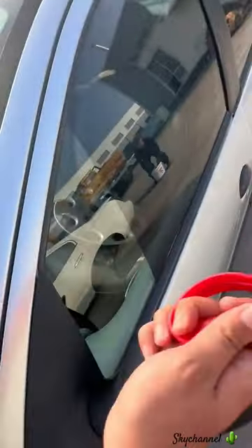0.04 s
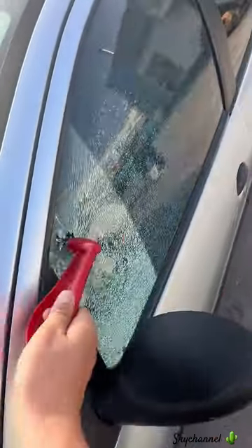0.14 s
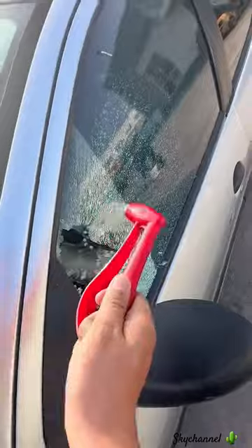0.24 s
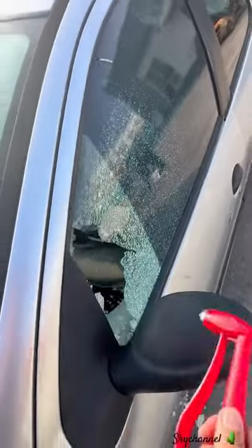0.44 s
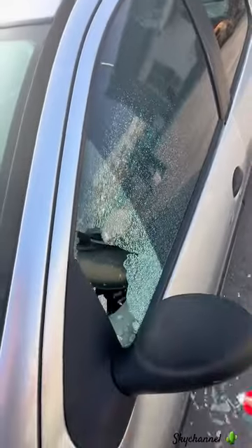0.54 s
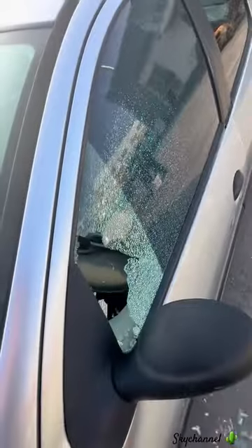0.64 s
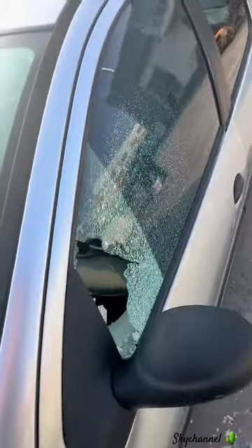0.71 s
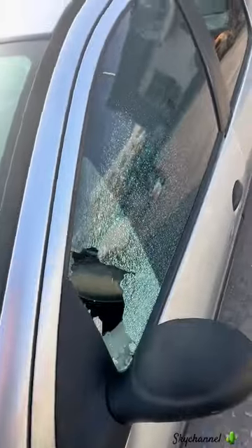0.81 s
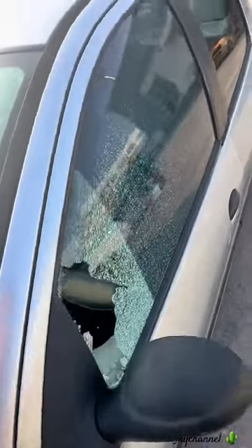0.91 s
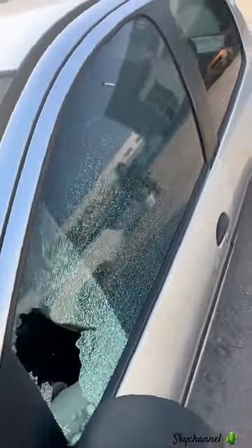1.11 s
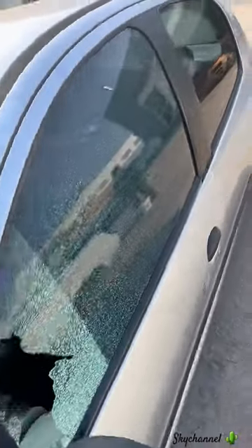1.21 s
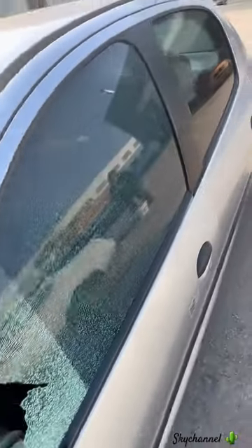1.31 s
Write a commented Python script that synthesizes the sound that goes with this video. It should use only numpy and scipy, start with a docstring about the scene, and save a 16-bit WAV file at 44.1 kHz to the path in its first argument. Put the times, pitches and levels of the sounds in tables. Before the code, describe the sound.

A car window shatters under a hammer blow, glass crumbs clattering down the door.

```python
"""A car's side window breaks under an emergency hammer, outdoors and close by.
The tip touches, the pane cracks and rings, and the door thumps as the hammer's head lands.
The tempered glass gives way in clumps of briefly ringing crumbs that clatter down the door and
thin out, with sharp snaps and the clinks of larger shards. A low street rumble lies underneath."""
import sys
import numpy as np
from scipy import signal
from scipy.fft import rfft, irfft, next_fast_len
from scipy.io import wavfile

SR = 44100
rng = np.random.default_rng(int(sys.argv[2]) if len(sys.argv) > 2 else 0)


def output_pcm(signal):
    """Save a mono or channel-first signal as 16-bit PCM at the path in sys.argv[1].

    Samples are clipped to [-1, 1] before scaling.
    """
    pcm = np.clip(np.atleast_2d(signal).T, -1, 1) * 32767
    wavfile.write(sys.argv[1], SR, np.round(pcm).astype(np.int16))


N = 59535


def amp(db):
    return 10 ** (np.asarray(db) / 20)


def unit_rms(x):
    return x / np.sqrt(np.mean(x ** 2) + 1e-20)


def along(points, hz):
    """Interpolate (frequency, value) points on a log axis."""
    f, v = np.transpose(points)
    return np.interp(np.log(hz + 1), np.log(f + 1), v)


def since(s):
    """Seconds after time s, zero before it."""
    return np.maximum(np.arange(N) / SR - s, 0)


def curves(rows):
    """One value per sample for each column after the time."""
    s, *columns = np.transpose(rows)
    return [np.interp(since(0), s, column) for column in columns]


def filtered(x, response):
    """Apply a complex frequency response."""
    size = next_fast_len(N + SR // 4)
    return irfft(rfft(x, size) * response(np.fft.rfftfreq(size, 1 / SR)), size)[..., :N]


def noise(colour):
    """Two independent coloured noises, rms 1."""
    return unit_rms(filtered(rng.standard_normal((2, N)), lambda hz: amp(along(colour, hz))))


def burst(s, db, t60_s, attack_s=1e-4, hold_s=0):
    """Envelope: linear attack, hold from onset, exponential release."""
    return np.minimum(since(s) / attack_s, 1) * amp(db - 60 * since(s + hold_s) / t60_s)


def ring(s, hz, db, t60_s, attack_s, drift_rad=0):
    """One struck mode: a decaying sine."""
    return burst(s, db, t60_s, attack_s) * np.sin(2 * np.pi * hz * since(s) + drift_rad)


# likeness at the two microphone ports (frequency [Hz], coherence [clipped to -1..1])
PORT_COHERENCE = [(300, 2.8), (700, 0.4), (1400, 0.64), (2200, 1.45), (5000, -0.03), (7500, 1.4),
                  (14000, 6)]


def widen(pair, coherence=PORT_COHERENCE):
    """Mix two independent signals to left and right with the given coherence."""
    angle = lambda hz: np.arccos(np.clip(along(coherence, hz), -1, 1)) / 2
    mid, side = filtered(pair, lambda hz: np.array([np.cos(angle(hz)), np.sin(angle(hz))]))
    return np.array([mid + side, mid - side])


# rumble spectrum (frequency [Hz], gain [dB])
STREET_COLOUR = [(20, -4), (40, -1.5), (60, 2), (130, -3), (165, -9.5), (190, 2), (225, -10.5), (370, -11),
                 (600, -20.5), (2000, -34), (8000, -39), (10500, -47), (12000, -86)]
# rumble envelope (time [s], level [dB])
STREET_ENVELOPE = [(0, -46.5), (.2, -43), (.97, -44), (1.15, -41.5), (1.35, -46)]
# left-right likeness (frequency [Hz], coherence [0..1])
STREET_COHERENCE = [(60, 0.98), (400, 0.98), (2000, 0.067), (9000, 0.72)]


def street():
    """Low outdoor rumble with a faint hiss."""
    return widen(noise(STREET_COLOUR), STREET_COHERENCE) * amp(curves(STREET_ENVELOPE)[0])


# tip's touch, break and later splits (time [s], level [dB], t60 [s])
PANE_CRACKS = [(0.2012, -31, 0.13), (0.2099, -5.5, 0.0068), (0.2106, -24, 0.054), (0.2145, -20, 0.007),
               (0.3488, -18, 0.031), (0.4502, -16.5, 0.016), (0.899, -33, 0.024)]
# crack spectrum (frequency [Hz], gain [dB])
PANE_CRACK_COLOUR = [(200, 0), (1000, -1.5), (1400, 5.5), (2100, -13), (2900, 9.5), (4300, -7), (5200, -4),
                     (6250, -2), (7300, -3), (10000, -3), (15500, -5)]
# pane, struck by the tip (frequency [Hz], level [dB], t60 [s])
PANE_MODES = [(2840, -5, 0.0098), (6320, -8, 0.011), (1290, -14.5, 0.016), (940, -14, 0.015),
              (841, -7.5, 0.015), (395, -24, 0.055)]
# door, struck by the head (frequency [Hz], level [dB], t60 [s])
DOOR_MODES = [(128, -13.5, 0.052), (300, -20, 0.052), (185, -26, 0.071), (448, -21, 0.12),
              (680, -25.5, 0.045), (960, -23, 0.028), (1230, -29, 0.24), (1608, -26.5, 0.13),
              (55.3, -24.5, 0.17)]
PANE_HIT_S, PANE_ATTACK_S = .2105, .00097
DOOR_HIT_S, DOOR_ATTACK_S = .2243, .0016


def hammer_blow():
    """The tip touches, the pane cracks through, and pane and door ring briefly."""
    cracks = widen(noise(PANE_CRACK_COLOUR)) * sum(burst(*crack) for crack in PANE_CRACKS)
    pane = sum(ring(PANE_HIT_S, *mode, PANE_ATTACK_S) for mode in PANE_MODES)
    door = sum(ring(DOOR_HIT_S, *mode, DOOR_ATTACK_S) for mode in DOOR_MODES)
    return cracks + pane + door


def fragment_hits(hz, spread_oct, t60_cycles, scatter_db, count, fragments=110):
    """Random contacts, rms 1, shared among fragments that each ring at their own pitch."""
    which, when, chance = rng.random((3, count))
    rank = (np.arange(fragments)[:, None] + rng.random((fragments, 1))) / fragments
    deviation = np.log((rank + .02) / (1.02 - rank)) * np.sqrt(3) / np.pi  # logistic spread
    pitch_hz = np.minimum(hz * 2 ** (spread_oct * deviation), SR / 2)
    age = np.arange(int(t60_cycles * SR / hz))
    cycles = pitch_hz * age / SR
    rings = np.sqrt(pitch_hz / hz) * np.sin(2 * np.pi * cycles) * amp(-60 * cycles / t60_cycles)
    strength = amp(-scatter_db * np.log(np.maximum(chance, .02)))
    hits = strength[:, None] * rings[(which * fragments).astype(int)]
    positions = (when * N).astype(int)[:, None] + age
    return unit_rms(np.bincount(positions.ravel(), hits.ravel(), N)[:N])


# fall between clumps (time [s], chunks [dB], crumbs [dB], splinters [dB])
STEADY_FALL = [(.205, -100, -100, -100), (.215, -24.5, -26.5, -35), (.27, -41.5, -34, -40.5),
               (.36, -36.5, -33, -38.5), (.41, -39, -38.5, -44.5), (.46, -36, -29.5, -38.5),
               (.53, -37.5, -38.5, -43.5), (.58, -35, -34, -41), (.66, -38, -35, -40.5),
               (.695, -39, -41, -43.5), (.81, -34.5, -36, -41), (.85, -39.5, -37.5, -47.5),
               (.94, -38, -41.5, -43), (1.0, -50, -45.5, -51), (1.07, -44.5, -48, -62),
               (1.12, -56.5, -62.5, -65.5), (1.35, -56.5, -58.5, -65.5)]
# glass giving way (time [s], chunks [dB], crumbs [dB], splinters [dB], hold [s])
GLASS_CLUMPS = [(0.268, -29, -37, -43, 0.003), (0.295, -29.5, -27.5, -32, 0.014),
                (0.326, -32, -27.5, -27.5, 0.0061), (0.342, -40, -38.5, -29.5, 0.0065),
                (0.42, -48, -25, -28, 0.0071), (0.432, -26.5, -30, -37, 0.0057),
                (0.446, -51, -22, -26, 0.003), (0.47, -36, -28, -50, 0.0083),
                (0.496, -57, -32, -34, 0.0052), (0.541, -33.5, -32.5, -32, 0.02),
                (0.588, -44, -30.5, -36, 0.013), (0.619, -51, -48, -32.5, 0.0038),
                (0.717, -41, -32.5, -37.5, 0.018), (0.75, -48, -31.5, -33, 0.016),
                (0.766, -40, -33, -40, 0.009), (0.79, -33, -38, -42, 0.009),
                (0.809, -45, -27.5, -27, 0.0063), (0.895, -46, -29.5, -39.5, 0.0056),
                (0.916, -43, -31, -39.5, 0.0097), (0.955, -48, -35, -44, 0.012),
                (1.047, -48, -45, -49.5, 0.021), (1.147, -55, -48, -51, 0.0052)]
# tone of the shower (frequency [Hz], gain [dB])
SHOWER_COLOUR = [(300, -4), (950, 1), (2100, -3.5), (3000, .5), (5000, -2), (8000, -2), (10700, 4.5)]
# door under the chunks (frequency [Hz], gain [dB])
DRUM_COLOUR = [(40, -27), (130, -8), (300, -20), (450, -1.5), (650, -17), (1200, -12)]
# fragment sizes (pitch [Hz], spread [oct], t60 [cycles], scatter [dB], contacts [count])
CHUNK, CRUMB = (974, .558, 15.8, 2.2, 2100), (2903, .471, 31.3, 2.35, 5000)
SPLINTER, SLIVER = (7780, .315, 51, 2.4, 9000), (14000, .12, 25, 3.5, 80)
SHOWER_TOP_HZ, SLIVER_DB, DRUM_DB = 11000, -17, -5.5


def falling_glass():
    """Three sizes of fragment fall steadily and in clumps; chunks drum on the door, slivers tick."""
    flows = []
    for size, steady_db in enumerate(curves(STEADY_FALL)):
        clump_power = sum(burst(s, levels_db[size], t60_s=.052, attack_s=.0045, hold_s=hold_s) ** 2
                          for s, *levels_db, hold_s in GLASS_CLUMPS)
        flows.append(np.sqrt(amp(steady_db) ** 2 + clump_power))
    chunk_flow, _, splinter_flow = flows
    streams = np.array([[fragment_hits(*kind) for kind in (CHUNK, CRUMB, SPLINTER)] for _ in range(2)])
    tone = lambda hz: amp(along(SHOWER_COLOUR, hz)) / np.sqrt(1 + (hz / SHOWER_TOP_HZ) ** 60)
    shower = filtered(np.sum(streams * flows, axis=1), tone)
    slivers = amp(SLIVER_DB) * splinter_flow * np.array([fragment_hits(*SLIVER) for _ in range(2)])
    drumming = amp(DRUM_DB) * chunk_flow * noise(DRUM_COLOUR)
    return widen(shower + slivers + drumming)


# door panel resonances (frequency [Hz], width [Hz], gain [dB])
PANEL_MODES = [(244.8, 18.5, 0), (316.5, 18.7, 0), (364, 25, -3.5)]
# hum envelope (time [s], level [dB])
PANEL_ENVELOPE = [(.21, -90), (.23, -37), (.34, -39), (.39, -47.5), (.45, -41.5), (.51, -41.5), (.57, -48),
                  (1.0, -56.5)]


def panel_hum():
    """The door panel hums at its resonances under the falling glass."""
    def response(hz):
        return sum((-1) ** k * amp(db) * 1j * hz * width / (centre ** 2 - hz ** 2 + 1j * hz * width)
                   for k, (centre, width, db) in enumerate(PANEL_MODES))
    return unit_rms(filtered(rng.standard_normal(N), response)) * amp(curves(PANEL_ENVELOPE)[0])


# after the blow and as the loose edge gives (time [s], level [dB], t60 [s])
DOOR_SHUDDERS = [(0.217, -29, 0.23), (.436, -34, 0.084), (0.807, -33, 0.16)]
# shudder spectrum (frequency [Hz], gain [dB])
DOOR_SHUDDER_COLOUR = [(30, -20), (60, 2), (130, 8), (220, -7.5), (370, 6), (520, -3.5), (900, -50)]
THUMP_S, THUMP_DB, THUMP_HZ = .2230, -13.5, 208


def door_thump():
    """One low push of the door as the hammer's head bottoms out, and its dull shudders."""
    phase_squared = (np.pi * THUMP_HZ * (since(0) - THUMP_S)) ** 2
    push = amp(THUMP_DB) * (2 * phase_squared - 1) * np.exp(-phase_squared)
    shudders = sum(burst(*shudder, DOOR_ATTACK_S) for shudder in DOOR_SHUDDERS)
    return push + shudders * widen(noise(DOOR_SHUDDER_COLOUR))


# sharp snaps (time [s], level [dB])
PANE_SNAPS = [(0.2873, -15), (0.498, -22), (0.7307, -22), (0.7489, -14.5), (0.753, -27), (0.7601, -15.5),
              (1.258, -39), (1.309, -41)]
# snap spectrum (frequency [Hz], gain [dB])
PANE_SNAP_COLOUR = [(500, -28), (4000, -15), (8500, 2.5), (11000, -2), (12500, -11), (15500, -3)]


def snaps():
    """Single bright breaks in the crazed pane."""
    return widen(noise(PANE_SNAP_COLOUR)) * sum(burst(s, db, t60_s=.0087) for s, db in PANE_SNAPS)


# shard landings, plus one low knock of the door body at 0.8055 s (time [s], pitch [Hz], level [dB], t60 [s])
STRUCK_RINGS = [(.427, 4130, -22, 0.026), (.4496, 3370, -16.5, 0.038), (.7325, 955, -25, 0.026),
                (.7465, 957, -28, 0.033), (.769, 865, -24.5, 0.044), (.798, 1610, -25.5, 0.023),
                (.803, 1000, -23.5, .025), (.8055, 533, -22.5, 0.026), (.811, 796, -23.5, 0.049),
                (.8145, 2760, -21.5, 0.042), (.817, 1620, -28, 0.043), (.826, 867, -24.5, .04),
                (.859, 720, -25, 0.047), (.871, 788, -28.5, 0.062), (.8985, 1110, -22.5, 0.027),
                (.9245, 2730, -26, 0.022), (.931, 700, -33, 0.072), (1.0565, 2685, -34.5, 0.073),
                (1.153, 1550, -41, 0.033), (1.2575, 1460, -37, 0.0069), (1.2815, 2360, -44.5, 0.014),
                (1.3066, 1290, -40, 0.0087)]
# chip and scrape of a landing (frequency [Hz], gain [dB])
CHIP_COLOUR = [(400, -6), (2500, -1.5), (6000, -7.5), (12000, -35)]
CLINK_ATTACK_S, CLINK_WIDTH_HZ = .0007, 70
CHIP_DB, CHIP_T60_S = -6.5, .016


def clinks():
    """Larger shards land with a dry chip and rattle, each around its own pitch; among them the door gives one
    low knock."""
    step_rad = np.sqrt(2 * np.pi * CLINK_WIDTH_HZ / SR)
    drifts_rad = step_rad * np.cumsum(rng.standard_normal((len(STRUCK_RINGS), N)), axis=1)
    rings = sum(ring(*shard, CLINK_ATTACK_S, drift) for shard, drift in zip(STRUCK_RINGS, drifts_rad))
    chips = sum(burst(s, db + CHIP_DB, CHIP_T60_S, CLINK_ATTACK_S) for s, _, db, _ in STRUCK_RINGS)
    return rings + chips * widen(noise(CHIP_COLOUR))


# left-right likeness of the tail (frequency [Hz], coherence [0..1])
CABIN_COHERENCE = [(200, 1), (500, 1), (2000, 0.25), (8000, 0.38)]
CABIN_DB, CABIN_T60_S = -12, .055


def cabin(x):
    """Short reverberation of the car's body and interior."""
    decay = amp(-60 * since(0) / CABIN_T60_S)
    tail = widen(rng.standard_normal((2, N)) * decay, CABIN_COHERENCE)[:, :SR // 4]
    return amp(CABIN_DB) * signal.fftconvolve(x, tail / np.linalg.norm(tail[0]), axes=1)[:, :N]


# level between ports (frequency [Hz], left minus right [dB])
PORT_BALANCE = [(200, 0.5), (380, 0.5), (600, -7.5), (850, -5.5), (1290, -3.5), (2380, 2), (4400, -1),
                (12000, 0)]
# phase between ports (frequency [Hz], left lead [rad])
PORT_LEAD = [(150, 0), (600, -.6), (1300, .1), (2100, .1), (2700, -1.7), (3900, -2.2), (5400, -.5),
             (6500, -.2), (9000, -1.1), (11500, -2.8)]


def microphone_ports(x):
    """Sound reaches the two ports with different level and phase."""
    half = np.array([[.5], [-.5]])
    gain = lambda hz: amp(half * along(PORT_BALANCE, hz))
    return filtered(x, lambda hz: gain(hz) * np.exp(1j * half * along(PORT_LEAD, hz)))


def scene():
    """The breaking window and the cabin's answer, over the street."""
    window = hammer_blow() + door_thump() + falling_glass() + snaps() + clinks() + panel_hum()
    return microphone_ports(window + cabin(window)) + street()


LOW_CUT_HZ, TOP_HZ = 37, 15900


def record(dry):
    """Second-order low cut and a steep upper band limit."""
    low_cut = lambda hz: (1j * hz / (LOW_CUT_HZ + 1j * hz)) ** 2
    return filtered(dry, lambda hz: low_cut(hz) / np.sqrt(1 + (hz / TOP_HZ) ** 120))


dry = scene()
out = record(dry)
output_pcm(out)
```